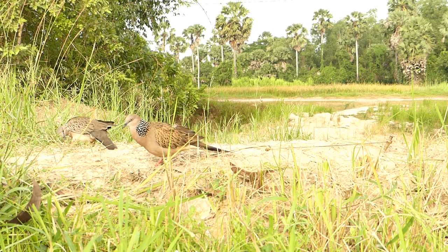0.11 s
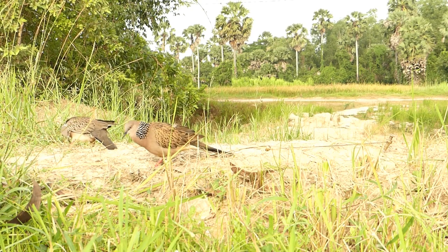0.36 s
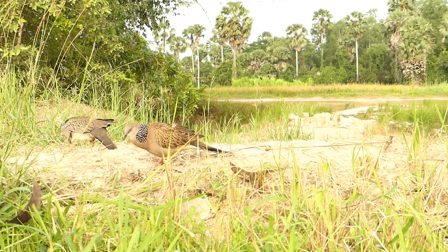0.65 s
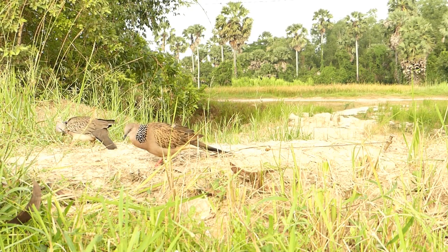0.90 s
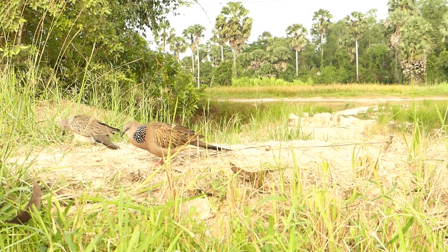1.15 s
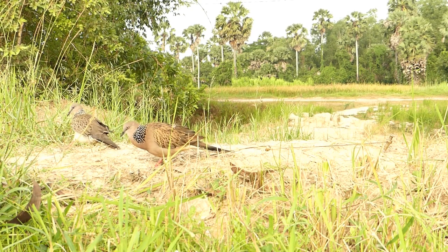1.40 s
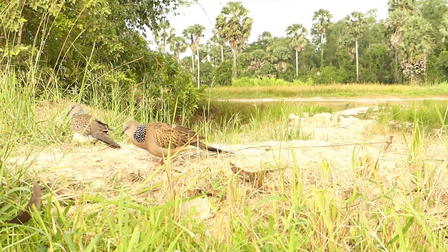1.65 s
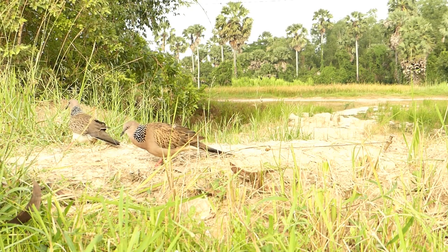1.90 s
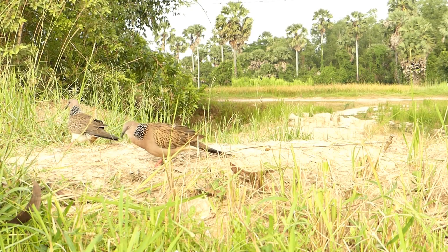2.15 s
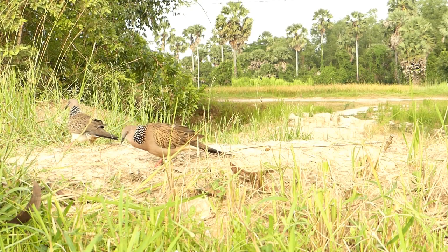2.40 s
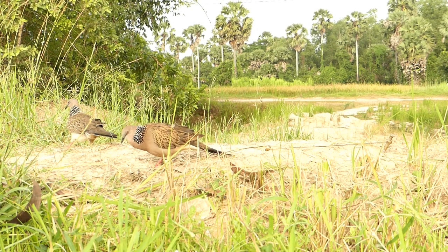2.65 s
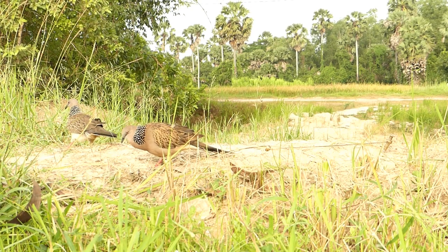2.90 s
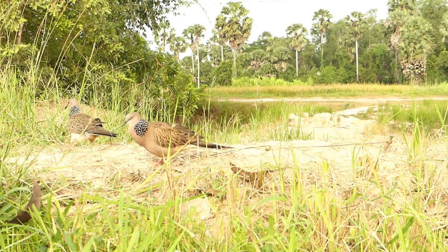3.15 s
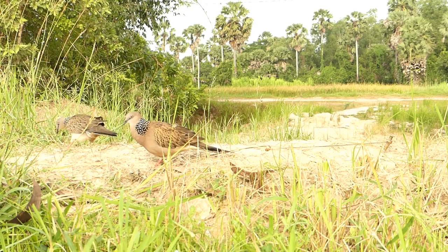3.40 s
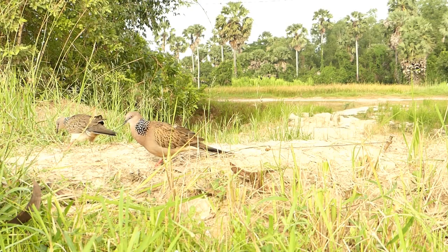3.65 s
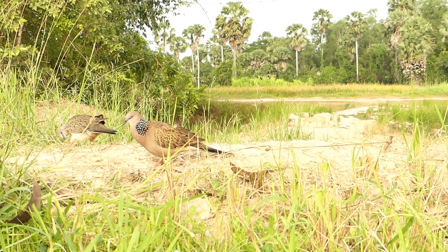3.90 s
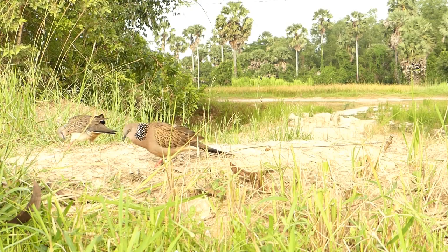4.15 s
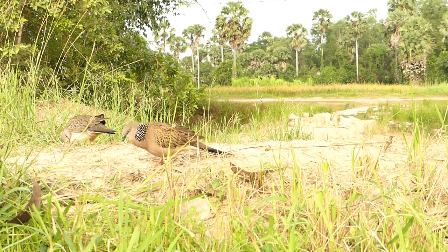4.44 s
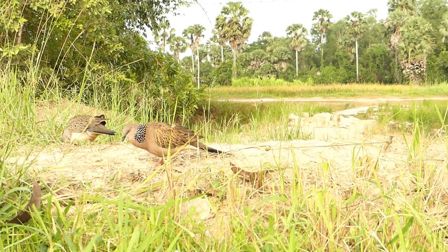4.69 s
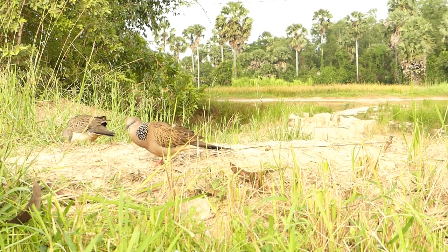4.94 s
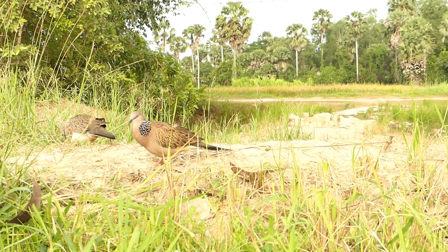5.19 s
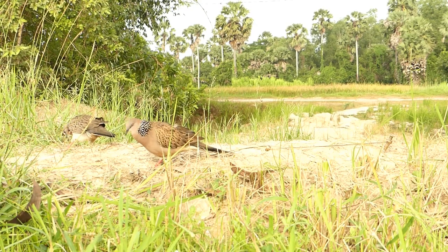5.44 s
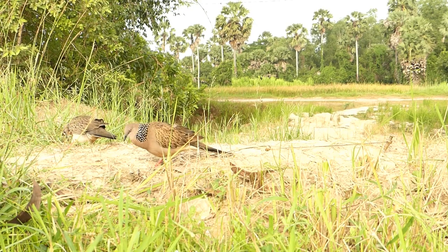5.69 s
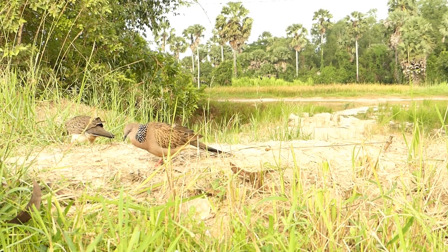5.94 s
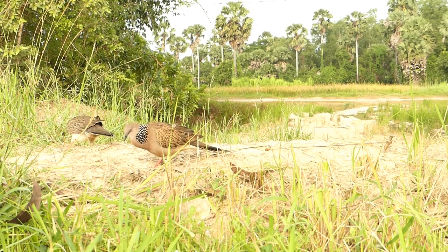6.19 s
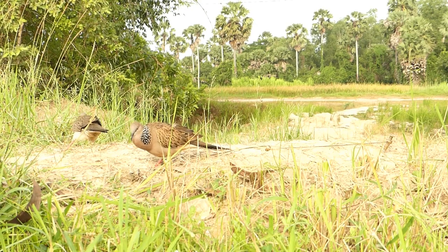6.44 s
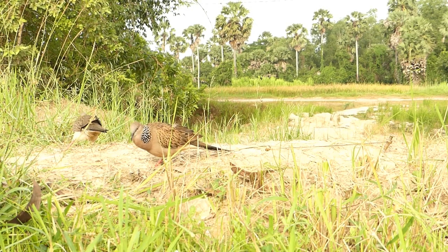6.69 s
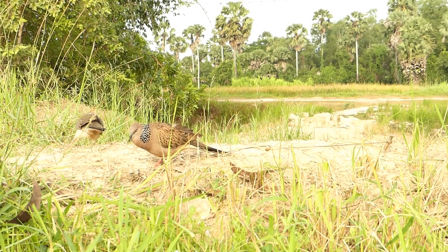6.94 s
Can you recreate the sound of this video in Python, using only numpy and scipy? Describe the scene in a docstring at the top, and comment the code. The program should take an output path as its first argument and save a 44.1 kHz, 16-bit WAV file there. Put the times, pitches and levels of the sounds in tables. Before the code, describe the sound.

Soft rolling dove coos, short then long, sound near in open countryside over a low murmur, thin insects and far-off bird chips.

```python
"""A low field murmur, a faint hum and crickets, all shaped noise, last throughout; far birds chip, chirp and
pipe as gliding sines from the first moments. At half a second a dove close by begins two-part phrases, a
dipping short coo and a long rolling one: a throbbing tone and breath through a crop resonance. Twigs and grass
tick as short noise bursts between 1.4 and 2.4 s; from 5.5 s a songbird whistles across the field."""
import sys
import numpy as np
from scipy import signal
from scipy.io import wavfile

SR = 44100
rng = np.random.default_rng(int(sys.argv[2]) if len(sys.argv) > 2 else 0)


def file_out(sig):
    """Save sig as 16-bit WAV at sys.argv[1]."""
    # one column per channel
    cols = np.atleast_2d(sig).T
    # limit, then scale
    lim = np.clip(cols, -1, 1)
    pcm = np.round(lim * 32767).astype(np.int16)
    wavfile.write(sys.argv[1], SR, pcm)


def ratio(d):
    """dB to gain"""
    e = np.asarray(d, float) / 20
    return 10 ** e


N = 312228
T = np.arange(N) / SR


def rms_one(x):
    """Normalization: scales to rms 1."""
    return x / np.sqrt(np.mean(x ** 2) + 1e-20)


def curve(rows):
    """Linear interpolation: a (time_s, value) table at every sample."""
    return np.interp(T, *np.transpose(rows))


def resonate(x, hz, width_hz):
    """Resonance: a two-pole filter with gain 1 at its peak."""
    r = np.exp(-np.pi * width_hz / SR)
    poles = [1, -2 * r * np.cos(2 * np.pi * hz / SR), r * r]
    return signal.lfilter(np.array([1, 0, -1]) * (1 - r * r) / 2, poles, x)


def drift(rate_hz):
    """Random modulation: low-passed noise of spread 1, made at every 40th sample."""
    r = np.exp(-80 * np.pi * rate_hz / SR)
    white = rng.standard_normal(N // 40 + 2002)
    slow = signal.lfilter([1], [1, -2 * r, r * r], white)[2000:]
    return np.interp(np.arange(N) / 40, np.arange(len(slow)), rms_one(slow))


def glide(out, rows):
    """Frequency modulation: adds a sine along (time_s, pitch_hz, level_db) rows, its ends rounded."""
    s, hz, db = np.transpose(rows)
    span = slice(round(s[0] * SR), round(s[-1] * SR))
    t = T[span]
    ends = np.clip(np.minimum(t - s[0], s[-1] - t) / 0.0012, 0, 1)
    phase = 2 * np.pi * np.cumsum(np.interp(t, s, hz)) / SR
    out[span] += ends * ratio(np.interp(t, s, db)) * np.sin(phase)


# Spectrum of the field murmur, relative: frequency_hz, density_db
FIELD_SPECTRUM = [(18, -55), (30, -38), (114, -1), (152, -4.5), (299, -3.5), (399, -8), (920, -15),
                  (1510, -22.5), (2980, -27.5), (3490, -25.5), (4780, -31), (5890, -23.5), (6710, -34),
                  (9420, -31.5), (15500, -43)]
# Correlation of left and right, from -1 to 1: frequency_hz, likeness
FIELD_LIKENESS = [(60, -0.1), (130, 0.048), (290, -0.83), (640, -0.75), (1400, -0.59), (3100, 0.21),
                  (6800, 0.46), (15000, -0.064)]
FIELD_DB = -41


def field(patchy_db):
    """Diffuse sound: drifting third-octave noise bands, each with its own left-right correlation."""
    out = 0
    edges = 30 * 2 ** (np.arange(28) / 3)
    white = rng.standard_normal((2, 2, N))
    for k, (low, high) in enumerate(zip(edges, edges[1:])):
        band = signal.butter(2, [low, high], "band", fs=SR, output="sos")
        mid, side = signal.sosfilt(band, white[k % 2])
        log_hz = np.log(low * high) / 2
        level_db, alike = (np.interp(log_hz, np.log(np.array(p)[:, 0]), np.array(p)[:, 1])
                           for p in (FIELD_SPECTRUM, FIELD_LIKENESS))
        alike = np.clip(alike, -1, 1)
        patches_db = patchy_db * min(1, 600 / high) ** 0.14 * drift(3.7)   # strongest in the lows
        stereo = np.sqrt(1 + alike) * mid + np.sqrt(1 - alike) * side * [[1], [-1]]
        out = out + ratio(level_db + patches_db) * stereo
    return ratio(FIELD_DB) * rms_one(out)


HUM_DB, HUM_SWELL_DB_PER_S = -53.5, 0.89
# Random waver of the hum: spread_db, rate_hz
HUM_WAVER = [1.5, 1.5]


def hum():
    """Narrow-band noise: a faint wavering, slowly swelling low hum with a weaker steady neighbour."""
    noise = rng.standard_normal((2, N))
    waver_db = HUM_WAVER[0] * drift(HUM_WAVER[1])
    main = ratio(HUM_DB + HUM_SWELL_DB_PER_S * T + waver_db) * rms_one(resonate(noise[0], 148.7, 5.6))
    return main + ratio(-56.5) * rms_one(resonate(noise[1], 188, 6.6))


def chirping(count_rows, depth_db):
    """Amplitude gating, in dB: loud for some seven tenths of each chirp period, then a rest."""
    wave = np.cos(2 * np.pi * curve(count_rows))
    return depth_db * (np.tanh(6.0 * (wave + 0.61)) - 1) / 2


def cricket(level_db, bands, per_s, sharp):
    """Stridulation: wing strokes gate noise in narrow resonances (centre_hz, width_hz, level_db)."""
    strokes = np.cumsum(per_s * (1 + 0.02 * drift(1.8))) / SR
    noise = rng.standard_normal(N)
    buzz = sum(ratio(db) * rms_one(resonate(resonate(noise, hz, width_hz), hz, width_hz))
               for hz, width_hz, db in bands)
    gated = buzz * np.abs(np.sin(np.pi * strokes)) ** sharp
    return ratio(level_db + 1.5 * drift(4.2)) * rms_one(gated)


# High cricket that drifts in pace: time_s, chirps_so_far
HISSING_CRICKET = [(.03, 0), (.6, 2), (1.38, 5), (2.36, 9), (5.71, 22), (6.57, 25), (7.09, 27)]
# High cricket of steady pace: time_s, chirps_so_far
RATTLING_CRICKET = [(.03, 0), (7.09, 30)]
# Loudness course of the low cricket, relative: time_s, level_db
LOW_CRICKET = [(0, -55), (.5, -60), (1.2, -74.5), (1.63, -63), (1.87, -55.5), (2.45, -65), (2.92, -55),
               (3.3, -66), (3.96, -58), (4.3, -65.5), (5.4, -66), (5.75, -57), (7.08, -59)]


def crickets():
    """Superposition: two chirping crickets, a low one that comes and goes, and a continuous one."""
    hissing_bands = [(6064, 300, -3.5), (5960, 190, -6.0), (5480, 190, -7.0)]
    out = cricket(-55 + chirping(HISSING_CRICKET, 20), hissing_bands, 94, sharp=0.58)
    out += cricket(-57 + chirping(RATTLING_CRICKET, 11.0), [(5820, 290, 0)], 42, sharp=1.5)
    out += cricket(curve(LOW_CRICKET) + 3, [(3533, 250, 0)], 30.5, sharp=0.45)
    out += cricket(-63.5, [(4300, 610, 0)], 50, sharp=0.18)
    return out


TREES_T60_S = 0.46


def trees(x, alike):
    """Reverberation: trunks and leaves scatter dying noise after a gap, partly shared by both ears."""
    t = T[:SR]
    decay = ratio(-60 * t / TREES_T60_S) * (t > 0.012)
    shared, left, right = rng.standard_normal((3, SR)) * decay
    tails = alike * shared + (1 - alike) * np.array([left, right])
    tails /= np.sqrt(np.sum(tails ** 2) / 2)
    return signal.fftconvolve(x[None], tails, axes=1)[:, :N]


# Falling chirps far off, relative levels: start_s, length_s, from_hz, to_hz, peak_db
CHIRPS = [(2.015, 0.03, 4400, 4030, -55), (3.587, .05, 3190, 2700, -55), (3.767, .054, 3170, 2820, -55),
          (4.208, 0.029, 4000, 3600, -56), (4.498, .018, 3830, 3040, -46.5),
          (4.792, 0.02, 3670, 3170, -46.5), (5.065, 0.018, 4100, 2950, -44.5),
          (5.351, 0.0096, 3950, 3790, -50.5), (5.362, .017, 4595, 2780, -39),
          (6.574, .04, 4040, 3340, -47.5), (6.888, .03, 3910, 3220, -52)]
# Arched chirps, relative levels: start_s, top_hz, peak_db
ARCHES = [(2.092, 4590, -45), (4.624, 4500, -37)]
ARCH_S, ARCH_DROP = 0.025, 0.32   # length; share by which the feet lie lower


def chirps(out):
    """Frequency sweep: sines that fall or arch in pitch, loudest midway."""
    u = np.linspace(-1, 1, num=9)
    way = (u + 1) / 2
    for s, length, from_hz, to_hz, db in CHIRPS:
        glide(out, np.transpose([s + length * way, from_hz + (to_hz - from_hz) * way, db - 7.2 * u ** 2]))
    for s, hz, db in ARCHES:
        glide(out, np.transpose([s + ARCH_S * way, hz * (1 - ARCH_DROP * u ** 2), db - 8.3 * u ** 2]))


# Soft level notes far off, relative levels: start_s, length_s, pitch_hz, peak_db
NOTES = [(0, 0.23, 1160, -57), (0.475, 0.17, 2840, -63.5), (0.607, 0.22, 3240, -64.5),
         (0.943, 0.18, 2370, -58), (1.824, 0.42, 371.4, -52), (2.552, 0.11, 2446, -56),
         (3.103, 0.072, 2268, -54.5), (3.864, 0.088, 3130, -58.5), (3.969, 0.22, 660, -55),
         (5.077, 0.23, 1980, -63), (5.698, 0.026, 5620, -45)]


def notes(out):
    """Pure tone: steady sines that swell in and fade."""
    for s, length, hz, db in NOTES:
        glide(out, [(s, hz, db - 10.0), (s + 0.17 * length, hz, db),
                    (s + 0.7 * length, hz, db), (s + length, hz, db - 16.5)])


# High chip calls, relative levels: time_s, peak_db
CHIPS = [(0.0912, -50), (0.835, -44), (1.731, -33), (2.5193, -35), (3.3858, -42), (4.289, -47.5),
         (6.306, -44.5)]


def chips(out):
    """Transients: three quick ticks, then a falling slur."""
    for s, db in CHIPS:
        for k in range(3):
            start = s - 0.009 + 0.0084 * k
            glide(out, [(start, 6600, db - 13), (start + 0.0026, 7700 - 250 * k, db - 3),
                        (start + 0.0041, 7500 - 250 * k, db - 22.5)])
        glide(out, [(s + 0.012, 7350, db - 10.0), (s + 0.018, 7250, db),
                    (s + 0.024, 6450, db - 2.5), (s + 0.035, 6200, db - 18.5)])


# Rising whistles, relative levels: start_s, hook_length_s, low_hz, top_hz, top_level_db
RISES = [(6.11, .025, 2120, 3300, -28.5), (6.561, .027, 1972, 3050, -33), (6.889, 0.049, 2030, 2810, -33)]
SWEEP_S, HOOK_DB = 0.028, -13.5   # hook level is relative to the top
# Held whistles, relative levels: start_s, length_s, from_hz, slid_to_hz, ending_hz, level_db
HELD = [(5.521, .065, 4480, 4300, 4274, -36.5), (5.994, .035, 5480, 5310, 5270, -36.5),
        (6.156, .033, 3200, 3357, 3353, -24.5), (6.281, 0.069, 3990, 4010, 3990, -37.5),
        (6.311, 0.069, 4080, 4270, 4348, -29.5), (6.617, .016, 3020, 3097, 3196, -28.5),
        (6.633, 0.037, 3220, 4906, 4810, -29.5), (6.96, .018, 2640, 2820, 2964, -32),
        (6.976, .077, 2922, 3734, 3994, -22), (7.047, 0.049, 3840, 3900, 3964, -30)]
SLIDE_SHARE = 0.25   # share of the note spent on the opening slide


def songbird(out):
    """Portamento: sines sweep up from a low hook, or slide into a held pitch."""
    for s, hook, low_hz, top_hz, db in RISES:
        low_db = db + HOOK_DB
        glide(out, [(s, 1.07 * low_hz, low_db - 4.5), (s + 0.012, low_hz, low_db),
                    (s + hook, 1.015 * low_hz, low_db), (s + hook + SWEEP_S, top_hz, db)])
    for s, length, from_hz, slid_hz, hz, db in HELD:
        glide(out, [(s, from_hz, db - 7), (s + SLIDE_SHARE * length, slid_hz, db - 2.5),
                    (s + 0.72 * length, hz, db), (s + length, hz, db - 17)])


def far_birds():
    """Amplitude modulation: all far birds share one rapid random flicker of level."""
    out = np.zeros(N)
    for sing in (chirps, notes, chips, songbird):
        sing(out)
    return out * ratio(3.2 * drift(31))


# Twigs and grass tick, relative levels: start_s, peak_db, length_s, centre_hz, width_hz
TICKS = [(1.4, -33, 0.0014, 4887, 8530), (1.82, -40, 0.00092, 1000, 600), (1.843, -36, 0.00068, 1360, 906),
         (2.351, -43, .001, 1300, 894)]


def ticks():
    """Impulse excitation: a brief crackle through one broad resonance."""
    out = np.zeros(N)
    for s, db, length, hz, width_hz in TICKS:
        click = resonate(rng.standard_normal(400) * (T[:400] < length), hz, width_hz)
        out[round(s * SR):][:400] += ratio(db) * click / np.abs(click).max()
    return out


REST_HZ = 378   # pitch to which each coo falls at its end
UNEVEN_HZ, UNEVEN_PACE = 25, 0.13   # throb-to-throb spread at raggedness 1: pitch, share of speed


def throbbing(t, hz, sag, per_s, first_s, ragged, close):
    """Relaxation: the syrinx goes slack once a throb, unevenly; gives pitch and slackening of one coo."""
    chance = rng.standard_normal((3, 40))
    pace = 1 + ragged * UNEVEN_PACE * np.interp(t * 60, np.arange(40), chance[0])
    place = np.cumsum(per_s * pace) / SR   # throbs counted so far
    place += 2 - np.interp(first_s, t, place)   # a whole number is a throb top
    depth = sag * np.exp(ragged * chance[1, place.astype(int)] - ragged ** 2)   # ragged: slurs many throbs
    slack = np.clip(depth, 0, 1) * np.abs(np.sin(np.pi * (place % 1) ** 0.9)) ** 3.2
    hz = hz + ragged * UNEVEN_HZ * np.interp(place, np.arange(40), chance[2])
    closing = np.clip(1 - (t[-1] - t) / close[0], 0, 1) ** close[1]
    return hz + (REST_HZ - hz) * closing, slack


# Short coo, two swells with a dip between, at pace 1 and before throbs: time_s, pitch_hz, slackening (0-1)
SHORT_SHAPE = [(0, 381.3, 0.2), (0.017, 515, 0.03), (.035, 551.3, 0), (.052, 549.3, 0.02),
               (.08, 483.4, .24), (.1, 448.4, .32), (.13, 455.5, .38), (.147, 458, .2), (.175, 542.7, .12),
               (.205, 580, .07), (0.233, 591.4, .0)]
# Short coos: start_s, length_s, shape_pace, first_throb_top_s (after the start), slackening_share
SHORT_COOS = [(.522, 0.28, 1.01, 0.0039, 0.96), (2.387, 0.27, 0.96, 0.0012, 1.08),
              (4.267, 0.28, 0.96, 0.00089, 0.97), (5.643, 0.22, 1.0, .012, .9),
              (7.019, .275, 0.89, 0.006, 0.89)]
SHORT_THROBS_PER_S, SHORT_RAGGED = 58, 0.33   # mean throb rate; raggedness
SHORT_CLOSE = (0.032, 0.54)   # closing fall: length_s, curve (under 1 = sudden)


def short_coos():
    """Pitch contour: each short coo as (start s, own time s, pitch Hz, slackening)."""
    s, hz, sag = np.transpose(SHORT_SHAPE)
    for start, length, pace, first_s, share in SHORT_COOS:
        t = T[:round(length * SR)]
        pitch_hz = np.interp(t * pace, s, hz)
        slackening = share * np.interp(t * pace, s, sag)
        yield start, t, *throbbing(t, pitch_hz, slackening, SHORT_THROBS_PER_S, first_s,
                                   SHORT_RAGGED, SHORT_CLOSE)


# Long coo, a leap and a slow sinking, before throbs: time_s, pitch_hz, slackening (0-1), throbs_per_s
LONG_SHAPE = [(0, 395, .15, 27), (.011, 456.8, .24, 53), (.034, 597, .28, 41.7), (0.082, 641, .3, 48),
              (.16, 626, .26, 57), (.29, 600, .2, 70), (.36, 572.4, .14, 53.3), (.43, 533, 0.15, 60)]
# Long coos: start_s, length_s, first_throb_top_s (after the start), raggedness (0-1), end_slackening_share
LONG_COOS = [(0.954, 0.42, 0.034, 0.35, 1.5), (2.82, 0.43, .033, .4, .25), (4.708, .428, .037, .35, .25),
             (6.02, 0.41, 0.024, 0.76, .8)]
RAGGED_THROBS_PER_S = 62   # a very ragged coo tends to this rate, losing its slow opening roll
LONG_CLOSE = (0.043, 1.564)   # closing fall: length_s, curve (under 1 = sudden)


def long_coos():
    """Pitch contour: each long coo as (start s, own time s, pitch Hz, slackening)."""
    s, *shape = np.transpose(LONG_SHAPE)
    for start, length, first_s, ragged, left in LONG_COOS:
        t = T[:round(length * SR)]
        hz, sag, per_s = (np.interp(t, s, column) for column in shape)
        per_s += np.clip(ragged, 0, 1) ** 2 * (RAGGED_THROBS_PER_S - per_s)
        slackening = sag * (1 + (left - 1) * (t / length) ** 2)
        yield start, t, *throbbing(t, hz, slackening, per_s, first_s, ragged, LONG_CLOSE)


SLACK_HZ, PITCH_SAG = 270, 1.6   # pitch that slackening pulls towards; steepness of the pull
STRENGTH_SAG_DB, SLACK_OCTAVE_DB = -10, 7.0   # at full slackening: all of the voice; octave against the rest
VOICE_DB, OCTAVE_DB, BREATH_DB = -9.5, -17, -5.5   # relative levels
CROP_HZ, CROP_WIDTH_HZ, BEAK_CUT_HZ, FEATHER_CUT_HZ = 651.6, 136.5, 670, 1290
NECK_HZ, NECK_WIDTH_HZ, NECK_DB = 860, 300, -25   # the stretched neck lends the octave a weaker resonance


def dove():
    """Source and filter: the syrinx throbs in pitch and strength; the swollen crop passes its resonance."""
    source = np.zeros(N + SR)
    for start, t, top_hz, slack in [*short_coos(), *long_coos()]:
        hz = top_hz - (top_hz - SLACK_HZ) * np.tanh(PITCH_SAG * slack)
        phase = 2 * np.pi * np.cumsum(hz) / SR
        gate = np.clip(np.minimum(t / 0.0023, (t[-1] - t) / 0.0095), 0, 1)
        breath = ratio(BREATH_DB) * rng.standard_normal(len(t))
        tone = (hz / CROP_HZ) ** 2.75 * (np.sin(phase) + breath)   # the lower, the weaker the swing
        tone += ratio(OCTAVE_DB + SLACK_OCTAVE_DB * slack) * np.sin(2 * phase + 1.6)
        source[round(start * SR):][:len(t)] = gate * ratio(STRENGTH_SAG_DB * slack) * tone
    source = source[:N] + 1e-18
    cut = np.vstack([signal.butter(2, hz, fs=SR, output="sos") for hz in (BEAK_CUT_HZ, FEATHER_CUT_HZ)])
    crop = signal.sosfilt(cut, resonate(source, CROP_HZ, CROP_WIDTH_HZ))
    neck = resonate(resonate(source, NECK_HZ, NECK_WIDTH_HZ), NECK_HZ, NECK_WIDTH_HZ)
    return ratio(VOICE_DB) * (crop + ratio(NECK_DB) * neck)


def scene():
    """Superposition: near dove almost dry, far birds reverberant, insects and field behind."""
    near, far = dove() + ticks(), far_birds()
    late = np.roll(near, 3)   # a later, weaker right side sets dove and ticks a little to the left
    direct = np.array([near * ratio(7.0), (near + 0.37 * (late - near)) * ratio(6.5)])
    birds = direct + far * ratio([[-0.4], [0.4]])
    echo = ratio(-30.5) * np.roll(near, round(0.035 * SR))   # off the bushes behind the dove
    scattered = trees(ratio(-23.0) * near + ratio(-4.5) * far, alike=0.6)
    insects = crickets() * ratio([[-0.5], [0.5]])
    return birds + echo + scattered + insects + hum() + field(patchy_db=2.0)


def band_limit(x):
    """A steep low-pass at the top of the band."""
    return signal.sosfilt(signal.butter(12, 15630, fs=SR, output="sos"), x)


def record(dry):
    """Low-pass filtering: the finished mix loses its treble above about 15.6 kHz."""
    return band_limit(dry)


dry = scene()
out = record(dry)
file_out(out)
```